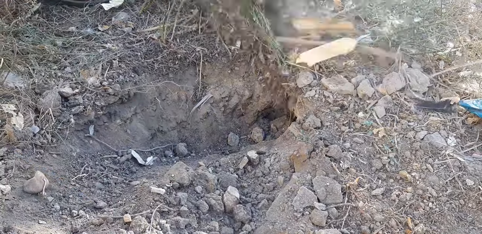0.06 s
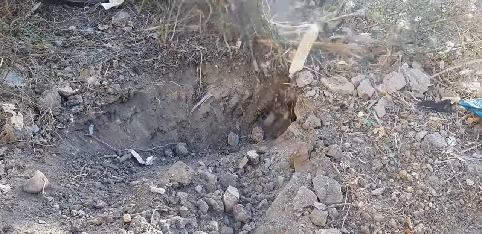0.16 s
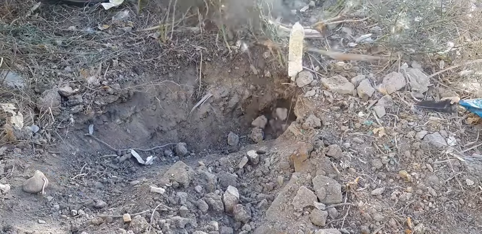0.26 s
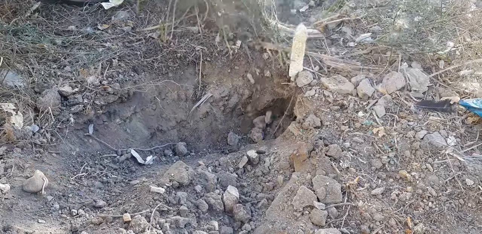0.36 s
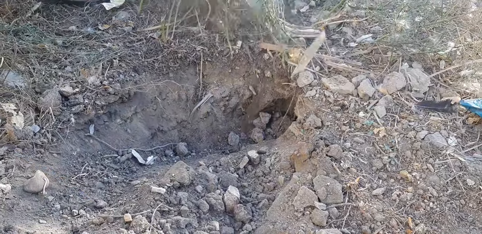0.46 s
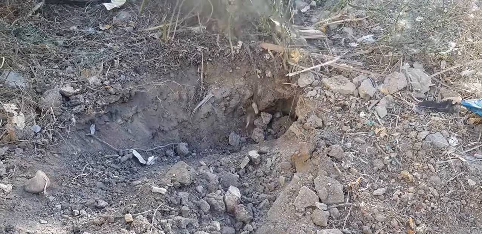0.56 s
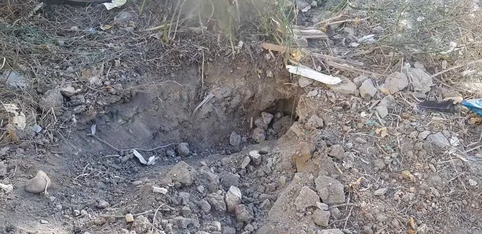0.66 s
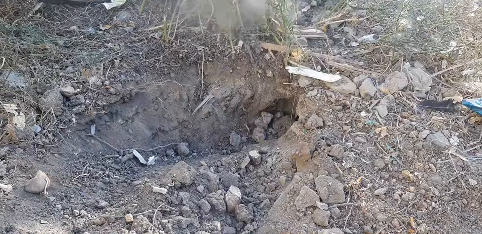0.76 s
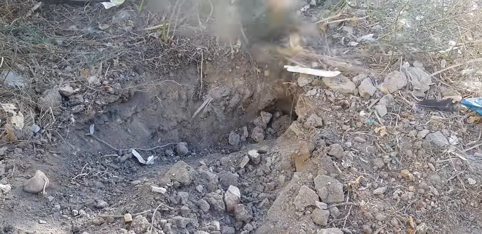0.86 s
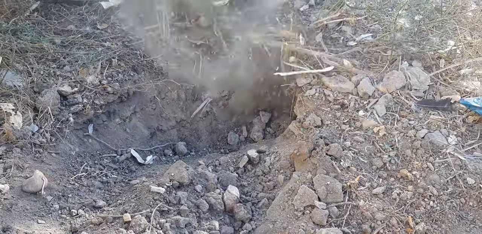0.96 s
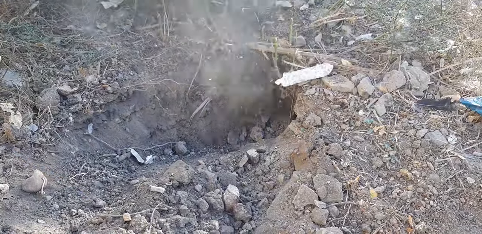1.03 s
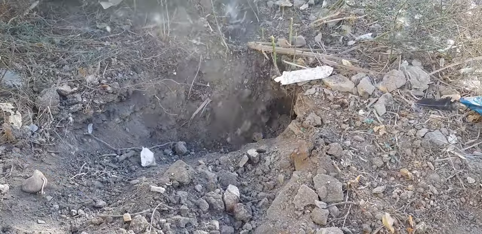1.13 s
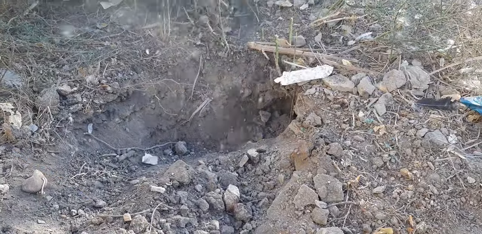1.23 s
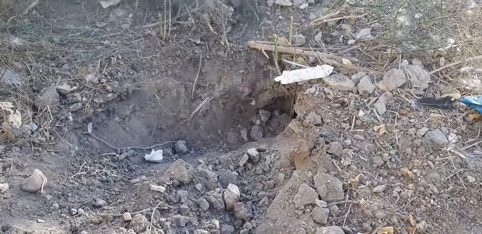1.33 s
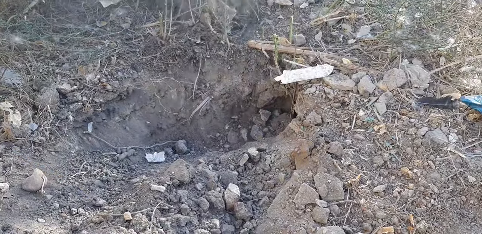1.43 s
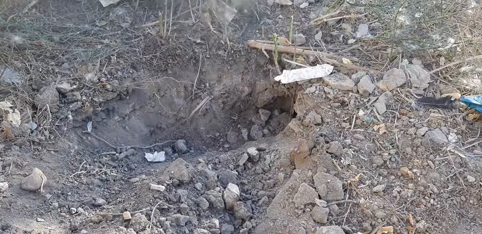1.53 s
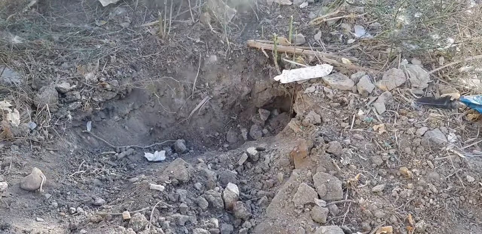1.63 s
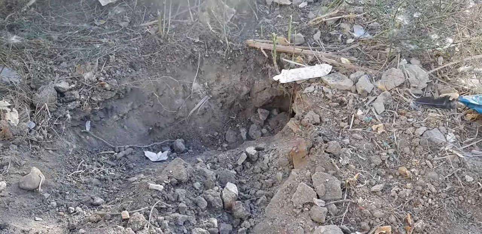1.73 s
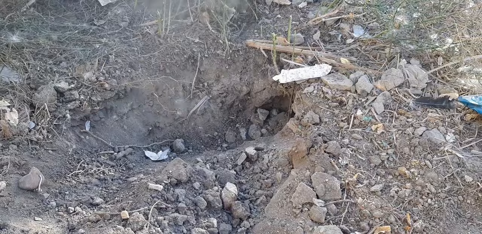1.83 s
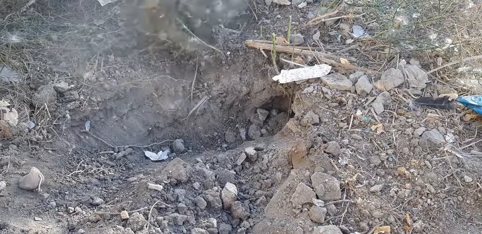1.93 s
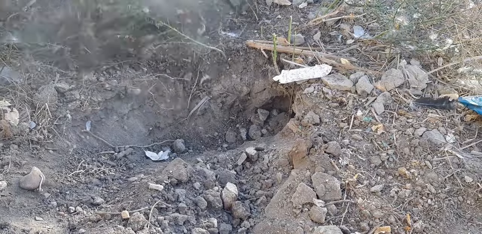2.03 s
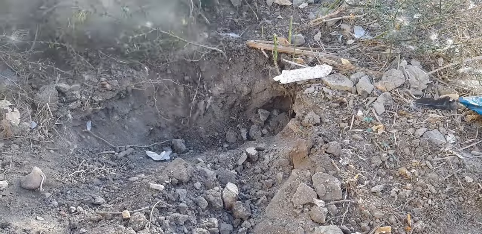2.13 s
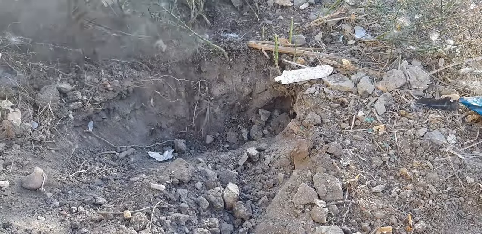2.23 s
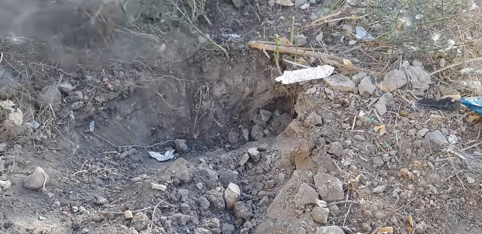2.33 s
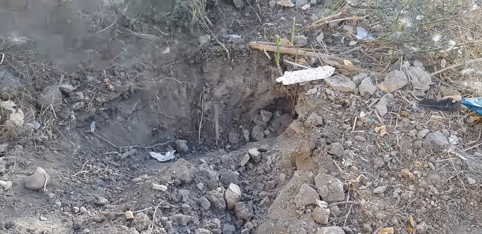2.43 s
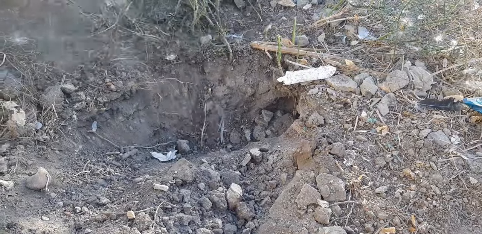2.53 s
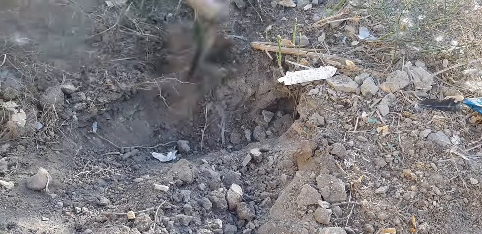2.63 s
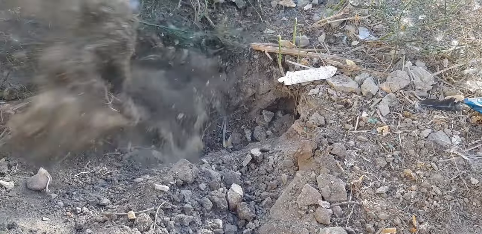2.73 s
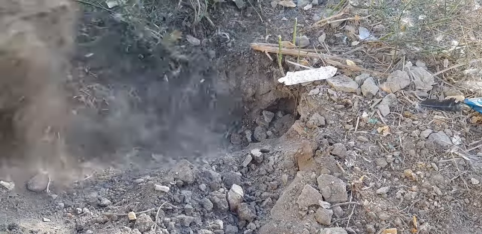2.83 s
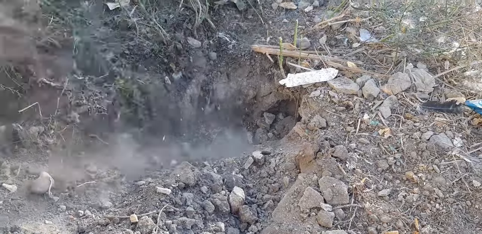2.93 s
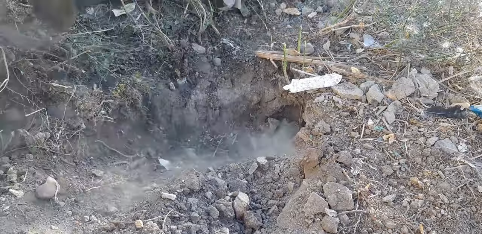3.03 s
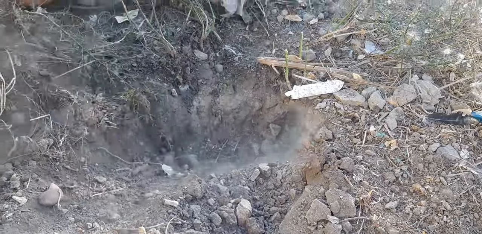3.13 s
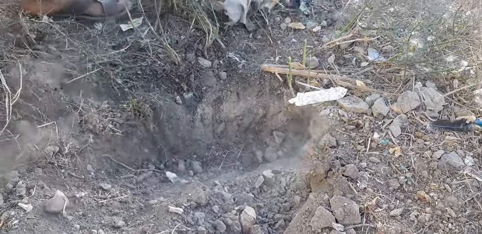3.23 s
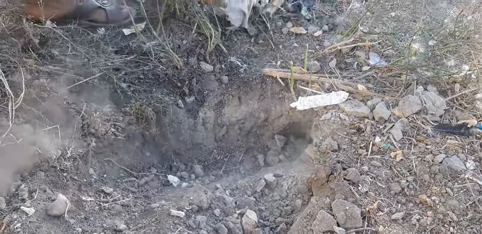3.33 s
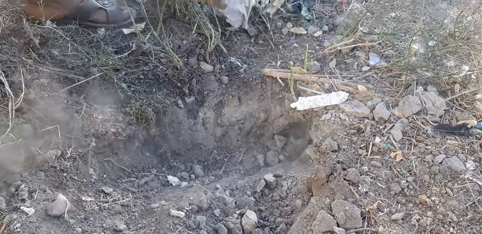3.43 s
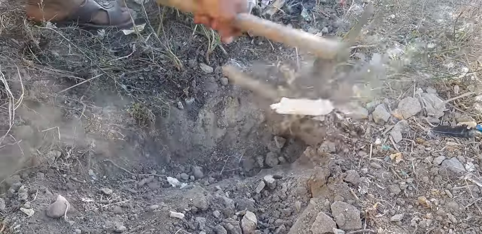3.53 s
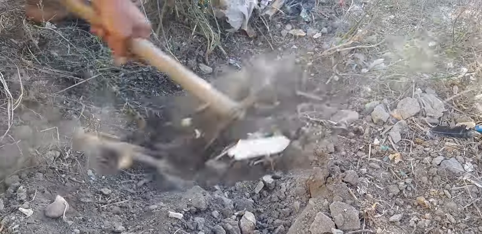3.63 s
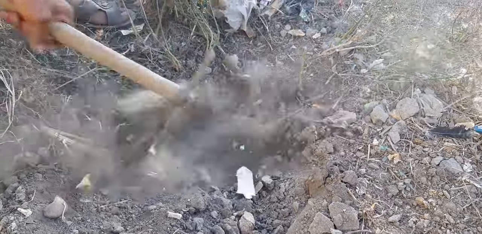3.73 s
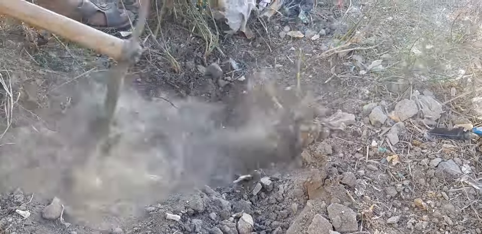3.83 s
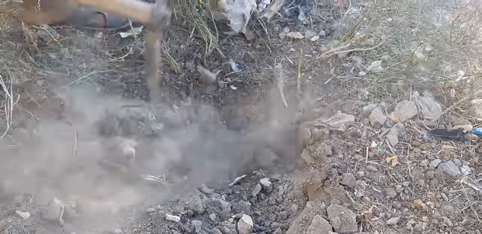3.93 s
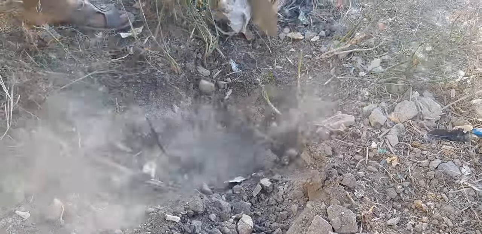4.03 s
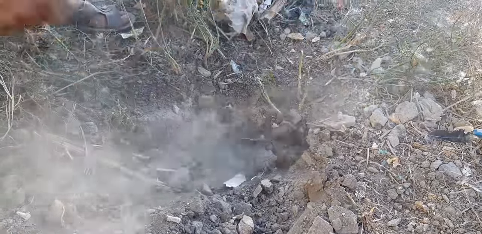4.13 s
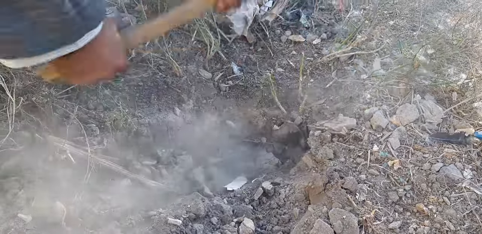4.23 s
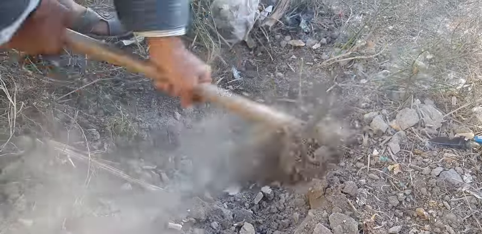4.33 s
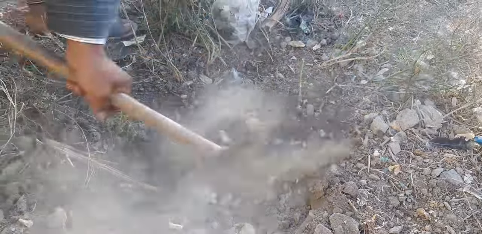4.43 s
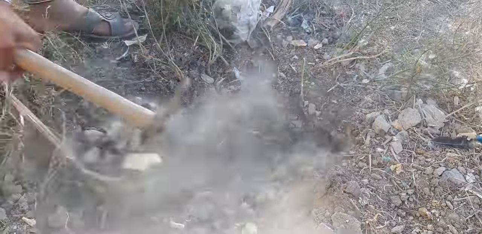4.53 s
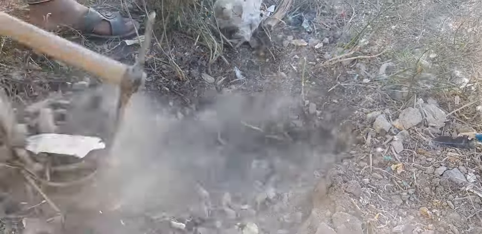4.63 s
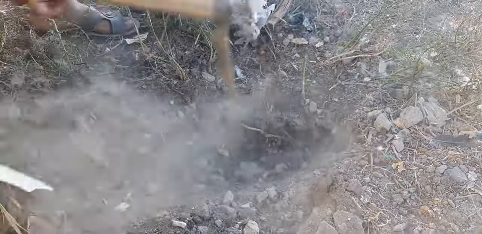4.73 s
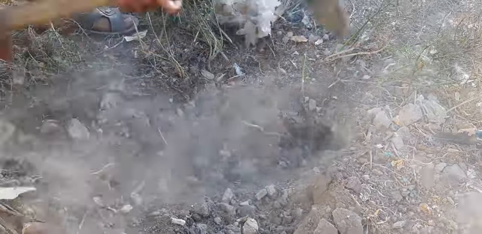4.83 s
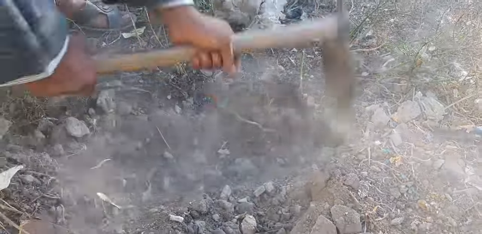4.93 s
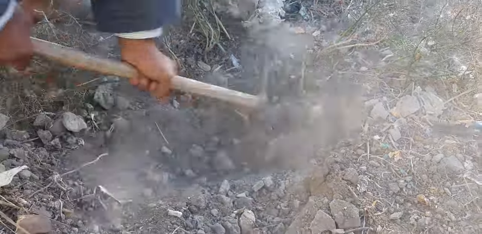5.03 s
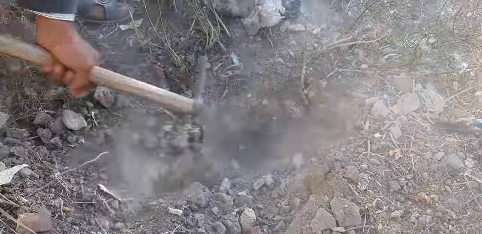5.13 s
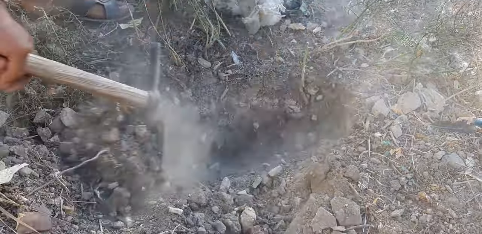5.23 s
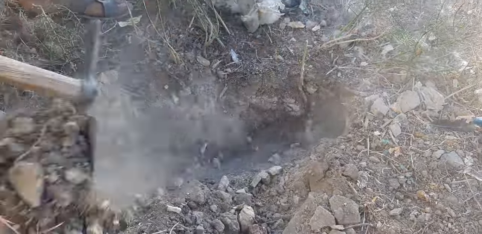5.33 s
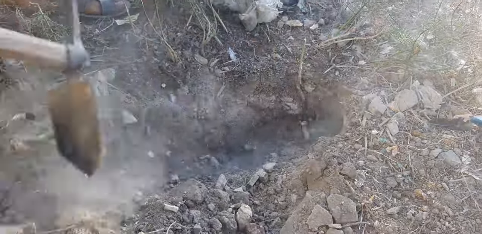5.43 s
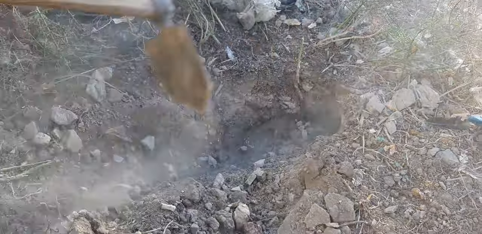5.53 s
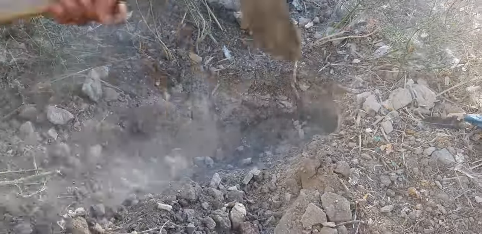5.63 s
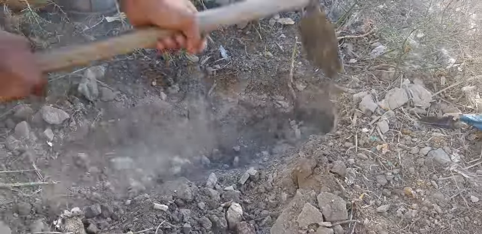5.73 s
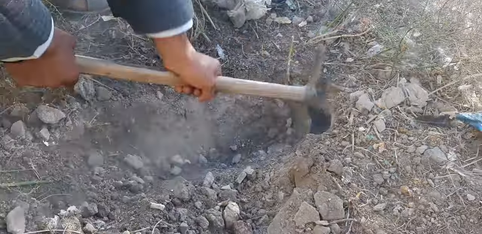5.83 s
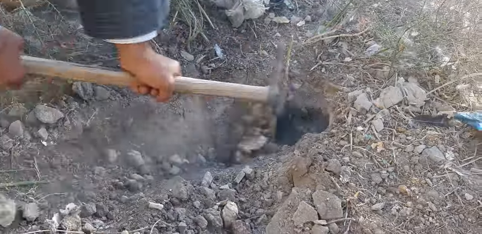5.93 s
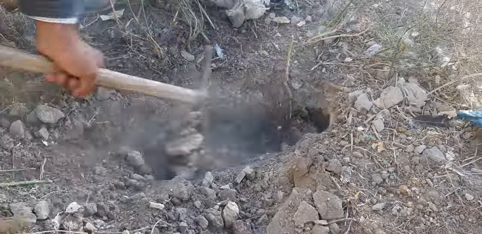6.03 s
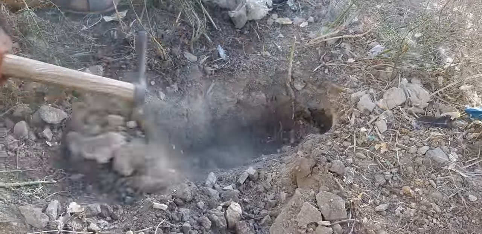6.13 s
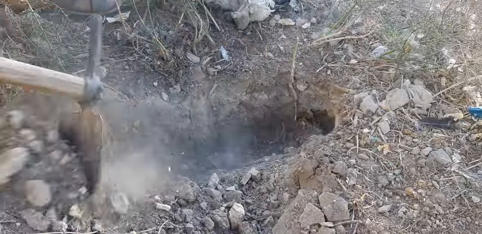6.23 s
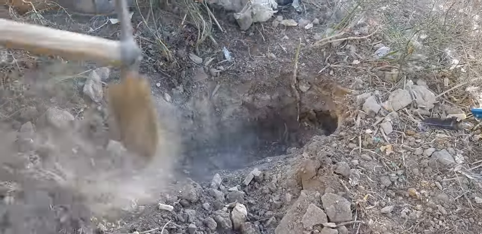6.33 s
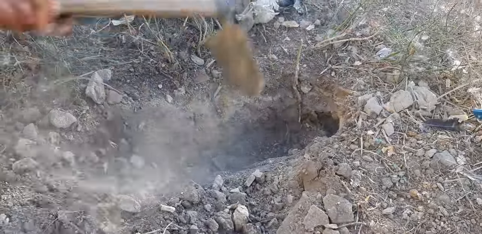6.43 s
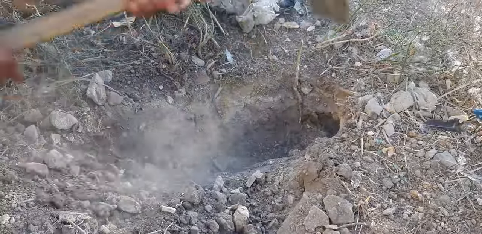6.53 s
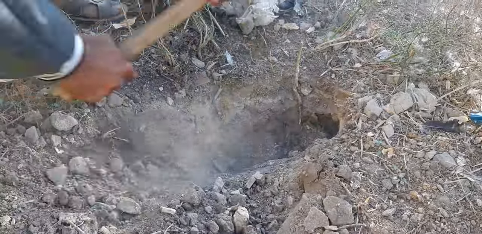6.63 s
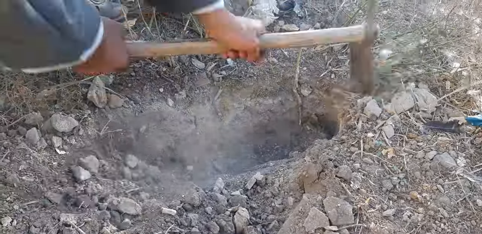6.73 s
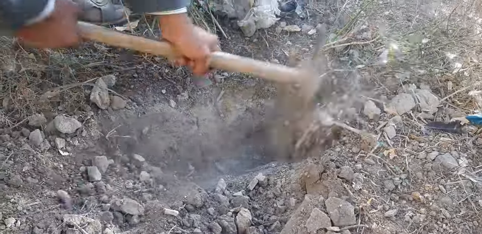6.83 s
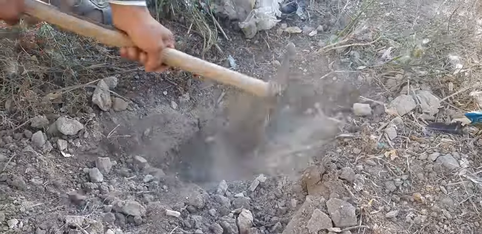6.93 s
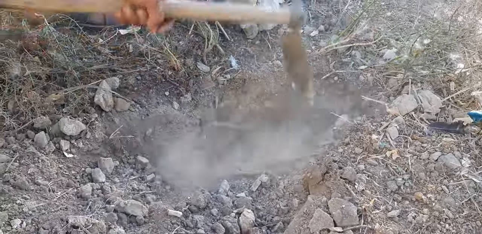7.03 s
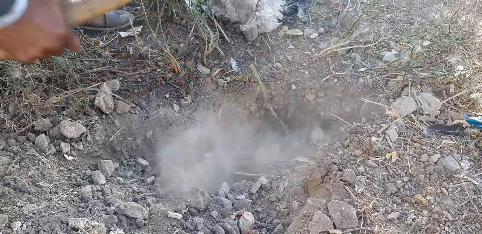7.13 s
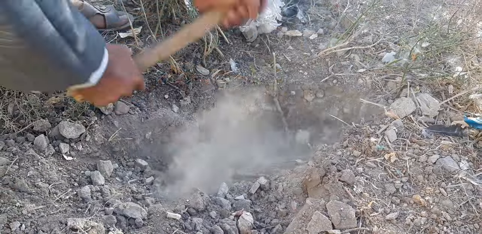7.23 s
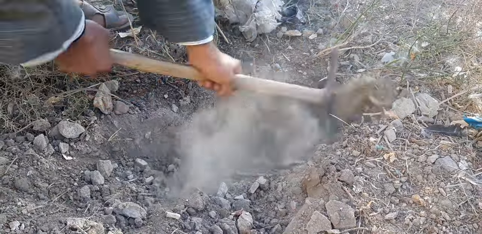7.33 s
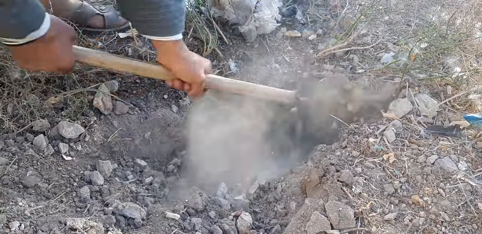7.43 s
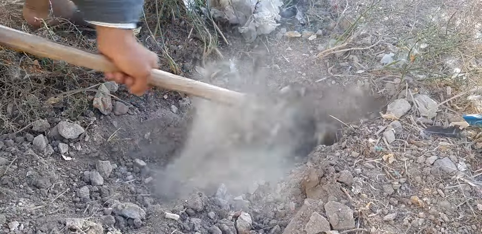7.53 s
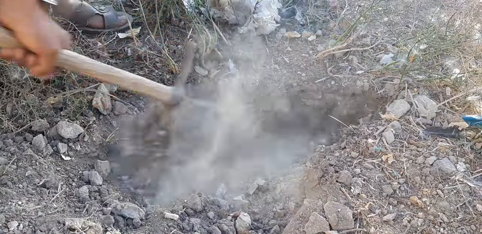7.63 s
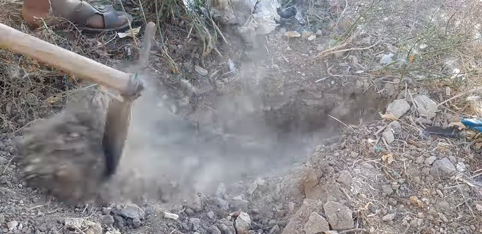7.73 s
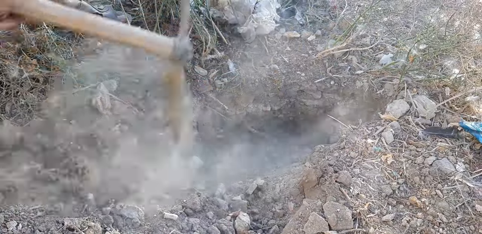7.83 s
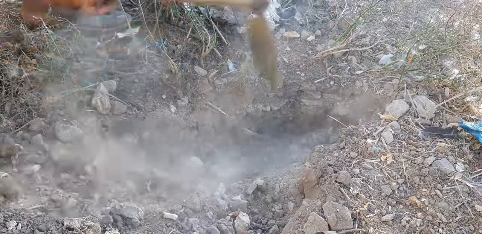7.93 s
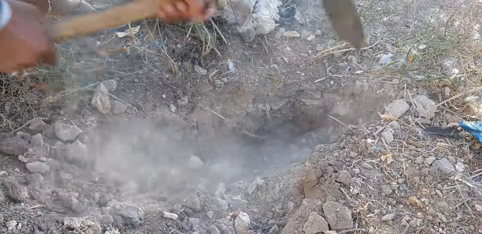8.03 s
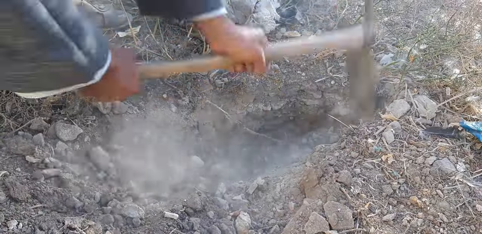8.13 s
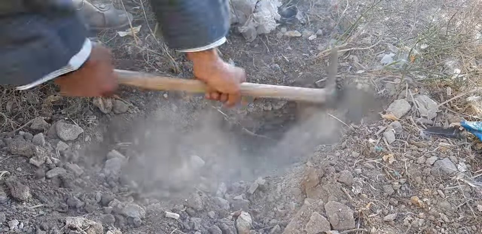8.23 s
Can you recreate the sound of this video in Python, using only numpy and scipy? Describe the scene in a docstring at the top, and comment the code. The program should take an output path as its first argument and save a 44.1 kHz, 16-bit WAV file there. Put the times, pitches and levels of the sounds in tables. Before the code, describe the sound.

Close-up digging outdoors: a steel blade cracks hard crust about once a second, knocking stones and raking loose, gritty earth, with light wind rumble.

```python
"""A pickaxe digs dry stony ground: each blow cracks the crust, knocks stones and thuds in the packed soil.
Stones are noise bursts shaking tuned rings; thuds are pushes ringing the ground's low modes.
Grit, dust and clods slide and patter after each blow as random ringing grains, and big clods land dully.
The steel blade is scraped by the grit and once rings faintly. A breeze rumbles as lumpy low noise on
two microphone ports over quiet air, and a faint far sine tone sounds near the end."""
import sys
import numpy as np
from scipy import signal
from scipy.fft import rfft, irfft, next_fast_len
from scipy.io import wavfile
from scipy.ndimage import uniform_filter1d

SR = 44100
rng = np.random.default_rng(int(sys.argv[2]) if len(sys.argv) > 2 else 0)


def generate_wav(sig):
    """Save sig (samples, or channels by samples) to the path in sys.argv[1] as 16-bit PCM at SR."""
    pcm = np.round(np.clip(np.atleast_2d(sig).T, -1, 1) * 32767).astype(np.int16)
    wavfile.write(sys.argv[1], SR, pcm)


N = 365148

# Modes of the steel head. Each row: pitch in Hz, level when tapped in dB, ring t60 when tapped in seconds,
# level when scraped in dB.
STEEL_MODES = [(870, -2, 0.21, -5.5), (1320, -2, 0.27, -15), (1586, 13, 0.015, 5.5), (2634, 14, 0.041, 3.5),
               (3747, -5, 0.089, -4), (4480, -8, 0.025, 0), (4860, -7, .03, -1.5),
               (5720, -25.5, 0.026, -2.5), (6310, -18, 0.016, 5.5), (7110, -18.5, 0.032, 7.5)]
# Modes the packed soil thuds with. Each row: pitch in Hz, level in dB, t60 in seconds.
GROUND_MODES = [(77.4, -10, 0.065), (127, 0, .05), (179, 8.5, 0.076), (262, -1, 0.08), (427, -15, 0.037)]
# The blade bites the crust. Each row: start in seconds, length in seconds, grit level in dB, then clods,
# dust and slump, each in dB over the grit.
BLADE_BITES = [(0.88, 0.042, -24, -15, 0.5, -38), (1.89, 0.024, -28.5, -6.5, -3, -2.5),
               (2.636, 0.039, -23.5, -6.5, -4.5, 0), (3.506, 0.0039, -31, -10, 5.5, 0),
               (3.547, 0.079, -33, 0, -3.5, 0), (4.3, 0.09, -23.5, -8, -9, -3.5),
               (4.972, 0.11, -26, -5, -9, -6), (5.861, 0.027, -29, -7.5, -9, -25),
               (6.777, 0.16, -24.5, -4.5, -5, -11.5), (7.329, 0.056, -22, -2.5, -6, -9),
               (8.194, 0.092, -26, -8.5, 1, -23.5)]


def gain_of(db):
    """Turns dB into an amplitude factor."""
    return 10 ** (np.asarray(db) / 20)


def evened(x):
    """Scales x to an RMS of one."""
    return x / np.sqrt(np.mean(x ** 2) + 1e-20)


def read(points, hz):
    """Reads a (Hz, value) curve, straight between its points on a log frequency axis."""
    f, value = np.transpose(points)
    return np.interp(np.log(hz + 1), np.log(f + 1), value)


def tinted(x, points):
    """Filters x by a (Hz, dB) spectrum."""
    length = x.shape[-1]
    size = next_fast_len(length)
    gain = gain_of(read(points, np.fft.rfftfreq(size, 1 / SR)))
    return irfft(rfft(x, size) * gain, size)[..., :length]


def ring(x, hz, t60):
    """One decaying mode, a two-pole resonator, struck by x."""
    radius = 10 ** (-3 / (t60 * SR))
    angle = 2 * np.pi * min(hz, SR / 2.2) / SR
    return signal.lfilter([np.sin(angle)], [1, -2 * radius * np.cos(angle), radius * radius], x)


def add(mix, s, sound):
    """Lays a sound into the mix from s seconds, cut off at the end of the mix."""
    part = mix[:, round(s * SR):][:, :sound.shape[1]]
    part += sound[:, :part.shape[1]]


def clumps(seconds):
    """Slow random swings of RMS one: soil slips in lumps."""
    width = max(round(seconds * SR), 2)
    smooth = uniform_filter1d(rng.standard_normal(N), width)
    return evened(uniform_filter1d(smooth, width))


def quiet_air():
    """Steady tinted noise: the quiet surroundings."""
    # Spectrum shape of the surroundings. Each row: frequency in Hz, density in dB per Hz (relative).
    air_spectrum = [(24, -28.5), (40, 24), (345, -0.5), (790, -6), (852, 0), (1680, -42), (4340, -8.5),
                    (4800, -22.5), (16000, -10.5)]
    return gain_of(-61.5) * evened(tinted(rng.standard_normal((3, N)), air_spectrum))


def far_tone():
    """A soft sine from far away that starts high, settles in pitch and wavers in level."""
    # One row: start in seconds, end in seconds, settled pitch in Hz, middle level in dB.
    tone_row = (7.99, 8.195, 447, -63)
    drop_hz, settle_s = 28, 0.035
    start, end, hz, db = tone_row
    t = np.arange(N) / SR
    on = uniform_filter1d(1. * (t > start) * (t < end), 400)  # soft edges
    pitch = hz + drop_hz * np.exp(-abs(t - start) / settle_s)
    level = gain_of(db + 3.9 * clumps(0.0081))
    return on * level * np.sin(2 * np.pi * np.cumsum(pitch) / SR)


def wind(slump):
    """Lumpy low rumble, partly separate at each port: breeze and soil slumping into the trench."""
    # The breeze swells and drops. Each row: time in seconds, level in dB before the lumps.
    breeze_swell = [(0, -51.5), (.38, -35.5), (.52, -48), (.8, -59.5), (1.2, -48), (1.7, -65.5), (2.4, -60),
                    (2.52, -40.5), (3.1, -53), (3.3, -46), (3.9, -66.5), (4.75, -54.5), (4.87, -28.5),
                    (5.35, -87.5), (5.6, -53), (6.1, -40.5), (6.6, -48.5), (7.1, -66), (8.28, -88)]
    # Spectrum shape of the rumble. Each row: frequency in Hz, level in dB (relative).
    rumble_colour = [(25, -45), (45, 5), (130, 6), (250, -7.5), (500, -23), (1200, -51.5)]
    alike, left_db = 0.34, 1  # power share both ports hear alike; left port over right in dB
    shared, *own = evened(tinted(rng.standard_normal((3, N)), rumble_colour))
    gusts = np.sqrt(alike) * shared + np.sqrt(1 - alike) * np.array(own)
    gusts *= gain_of([[left_db / 2], [-left_db / 2]])
    times, levels_db = np.transpose(breeze_swell)
    breeze = gain_of(np.interp(np.arange(N) / SR, times, levels_db))
    lumps = gain_of(3.5 * clumps(0.02) - 1.5)
    return np.hypot(breeze, slump) * lumps * gusts


def since_blow():
    """Seconds since the blade last bit; the first blow fell just before the start."""
    t = np.arange(N) / SR
    starts = np.array([-0.4] + [row[0] for row in BLADE_BITES])
    return t - starts[np.searchsorted(starts, t, "right") - 1]


def spill(s, length, rise_s, fade_db_per_s, end_db_per_s):
    """Power of moving soil: it rises, fades evenly while it runs, then dies quickly."""
    t = np.arange(N) / SR - s
    fall_db = fade_db_per_s * np.clip(t, 0, length) + end_db_per_s * np.clip(t - length, 0, 1)
    return (np.clip(t / rise_s, 0, 1) * gain_of(-fall_db)) ** 2


def moving_soil():
    """Levels of grit, dust, big clods, small clods and slump: the powers of all bites and slides add."""
    # Loosened soil slides and trickles. Each row: start in seconds, length in seconds, grit level in dB,
    # fade in dB per second, clods, dust and slump each in dB over the grit, big clods in dB over small.
    soil_slides = [(-.05, .39, -21.5, 48.4, -9, 1, -30, -2), (0.392, 0.28, -41.5, 32, -13.5, 1, -34, -2),
                   (0.719, 0.18, -58.5, 11, -8, 1.5, 2, 5), (0.925, 0.48, -30, 45, -0.5, 0.5, -5, 1.5),
                   (1.401, 0.64, -50.5, 19, 0, -1.5, 2.5, -4), (1.918, 0.11, -37.5, 18, -5.5, 0.5, -4.5, 1),
                   (2.05, 0.3, -50.5, 26, -7.5, 3.5, 1.5, 2), (2.28, 0.17, -48, 35, -7.5, 1.5, 0, 4),
                   (2.46, 0.27, -62, 2.4, -8.5, 4, -13, 7.5), (2.682, 0.1, -35.5, 2.7, -9, -5.5, 6, -5.5),
                   (2.83, 0.82, -46, 35.5, -21, 2, 10.5, 17),
                   (3.47, 0.046, -45, 3.9, -11.5, 0.5, -11.5, -8),
                   (3.599, 0.23, -37.5, 63, -4, -2, 1.5, -4), (3.8, 0.63, -57.5, 20.5, -4, 1, -14, 0.5),
                   (4.378, 0.031, -39, 5, 5, -3.5, 0, -0.5), (4.45, 0.47, -50.5, 20, -5.5, -0.5, 3.5, 1),
                   (5.07, 0.15, -48, 3.5, 4.5, -7.5, 5.5, 2), (5.21, 0.03, -43.5, 3, -4, -4.5, -20, 3),
                   (5.28, 0.49, -55.5, 3.6, -5, -3, -42.5, 2.5), (5.9, 0.24, -43.5, 2.5, 1, -8, -0.5, 0.5),
                   (6.201, 0.13, -58, 4.3, -2, 1, 14.5, 1), (6.358, 0.033, -45, 3, -25, 3, -2.5, 1),
                   (6.462, 0.84, -62, 14, -5.5, -1.5, -11.5, 1.5),
                   (6.93, 0.86, -50, 84, -2.5, 0.5, -13, -2.5), (7.432, 0.27, -47, 3.1, 0, -7, -44, 0),
                   (7.73, 0.63, -62.5, 7.5, -8, -4, -19, 4), (7.86, 0.045, -64, 2.9, -21, 12.5, -18, 3)]
    power = np.zeros((5, N))

    def move(envelope, db, clods_db, dust_db, slump_db, big_db):
        mix_db = db + np.array([0, dust_db, clods_db + big_db / 2, clods_db - big_db / 2, slump_db])
        power[:] += gain_of(2 * mix_db)[:, None] * envelope  # twice the dB: power

    for s, length, db, clods_db, dust_db, slump_db in BLADE_BITES:
        bite = spill(s, length, rise_s=0.002, fade_db_per_s=96, end_db_per_s=493.5)
        move(bite, db, clods_db, dust_db, slump_db, big_db=-0.5)
    for s, length, db, fade, clods_db, dust_db, slump_db, big_db in soil_slides:
        slide = spill(s, length, rise_s=0.042, fade_db_per_s=fade, end_db_per_s=183)
        move(slide, db, clods_db, dust_db, slump_db, big_db)
    return np.sqrt(power)


def patter(lo_hz, hi_hz, per_s, cycles, spread_db, tilt_db, patchy_db, count):
    """Grains of many sizes land at random, each ringing for some cycles. Rows: shared path, left, right."""
    out = np.zeros((3, N))
    for k, hz in enumerate(np.geomspace(lo_hz, hi_hz, count)):
        where, chance, sign = rng.random((3, 3, int(per_s * N / SR)))
        force = gain_of(-spread_db * np.log(chance + 0.001)) * np.sign(sign - 0.5)
        train = np.zeros((3, N))
        np.put_along_axis(train, (where * N).astype(int), force, 1)
        train *= gain_of(patchy_db * clumps(0.023))  # each size of grain comes in spurts of its own
        t60 = cycles / hz
        grains = ring(ring(train, hz, t60), hz, t60)  # ringing twice softens each onset
        out += gain_of(tilt_db * k / count) * evened(grains)
    return evened(out)


def soil(grit_level, dust_level, big_level, small_level):
    """Dust hisses, grit crackles and clods patter lower; dust, grit and small clods slip in the same lumps."""
    lumps = clumps(0.0051)
    fresh = np.exp(-since_blow() / 0.29)  # fresh rubble is coarse, then fine soil trickles
    dust = patter(6500, 18000, per_s=1208, cycles=2.02, spread_db=0.72, tilt_db=14, patchy_db=0.94, count=5)
    dust *= gain_of(1.5 * lumps)
    grit = patter(1770, 7130, per_s=500, cycles=16, spread_db=1.8, tilt_db=9 - 4 * fresh,
                  patchy_db=2 + 0.8 * fresh, count=22)
    grit *= gain_of((0.64 + fresh) * lumps)
    grit *= gain_of(fresh * 2.7 * clumps(0.0085))  # fresh rubble crunches in separate bursts
    big = patter(398, 581, per_s=90, cycles=5.5, spread_db=3.4, tilt_db=1, patchy_db=4.8, count=5)
    small = patter(727, 1560, per_s=400, cycles=11, spread_db=2, tilt_db=3, patchy_db=2.6, count=7)
    small *= gain_of(0.95 * lumps)
    # a few larger bits tick among the grit
    pebbles = patter(890, 6500, per_s=5.3, cycles=60, spread_db=3, tilt_db=13, patchy_db=2.1, count=9)
    clods = (big_level * evened(big) + small_level * evened(small)) / np.sqrt(2)
    gritty = grit_level * (evened(grit) + gain_of(-16.5) * pebbles)
    return gritty + dust_level * evened(dust) + clods


def scrape(grit_level):
    """Grit grinds along the blade in jerks; each mode of the steel speaks in spurts of its own."""
    rub = rng.standard_normal((3, N)) * gain_of(3.5 * clumps(0.0021))
    modes = np.zeros((3, N))
    for hz, _, _, db in STEEL_MODES:
        spurts = gain_of(db + 14 * clumps(0.025))
        modes += spurts * evened(ring(rub, hz, t60=0.0085))  # the soil damps the ring
    fade = np.exp(-since_blow() / 0.075)
    return gain_of(-7) * grit_level * fade * evened(modes)


def blade():
    """The steel head rings as decaying sine modes after a stone taps it."""
    # Stones that ring the blade. Each row: time in seconds, level in dB added to that of every mode.
    blade_taps = [(3.891, -45.5)]
    out, t = np.zeros((3, N)), np.arange(20000) / SR
    for s, db in blade_taps:
        phases = 2 * np.pi * rng.random(len(STEEL_MODES))
        modes = np.zeros(len(t))
        for (hz, mode_db, t60, _), phase in zip(STEEL_MODES, phases):
            modes += gain_of(mode_db - 60 * t / t60) * np.sin(2 * np.pi * hz * t + phase)
        add(out, s, gain_of(db) * modes[None] * (1 - np.exp(-t / 0.000116)))
    return out


def clods_landing():
    """Each big clod lands and breaks: a dull noise burst rings a few low, quickly damped pitches."""
    # Clods that land. Each row: time in seconds, peak level in dB, pitch in Hz.
    clod_falls = [(0.349, -22, 600), (0.961, -22.5, 474), (1.001, -19.5, 517), (1.045, -22, 454),
                  (1.086, -23.5, 420), (1.141, -24.5, 395), (1.201, -30, 534), (1.271, -21.5, 478),
                  (3.707, -21, 544), (6.152, -17, 498), (7.582, -28, 586), (7.636, -28.5, 502)]
    out, t = np.zeros((3, N)), np.arange(6000) / SR
    envelope = (1 - np.exp(-t / 0.00071)) * (0.5 + np.exp(-t / 0.003)) * gain_of(-60 * t / 0.054)
    for s, db, hz in clod_falls:
        burst = rng.standard_normal((3, len(t))) * envelope
        body = 2 * evened(ring(burst, hz, 14 / hz))
        crumb_pitches = hz * np.geomspace(0.5, 4, 4)
        crumbs = sum(evened(ring(burst, f, 6 / f)) for f in crumb_pitches)
        clod = body + crumbs
        add(out, s, gain_of(db) * clod / abs(clod).max())
    return out


def ground_ring(push_s):
    """The packed soil's modes, rung by a push that dies away over push_s seconds."""
    push = np.exp(-np.arange(6000) / SR / push_s)
    return sum(gain_of(db) * evened(ring(push, hz, t60)) for hz, db, t60 in GROUND_MODES)


def thuds():
    """The packed soil takes a short push and rings low for a moment."""
    # Thuds under the heavier bites. Each row: time in seconds, peak level in dB.
    heavy_bites = [(0.914, -26.5), (1.9, -35.5), (2.641, -18.5), (3.513, -14), (3.551, -37.5),
                   (4.302, -18.5), (4.975, -37.5), (6.784, -17), (7.334, -25.5), (7.371, -20.5),
                   (8.243, -23.5)]
    out, thud = np.zeros((3, N)), ground_ring(0.00022)
    for s, db in heavy_bites:
        add(out, s, gain_of(db) * thud[None] / abs(thud).max())
    return out


def knocks():
    """A ragged crack and a snap shake the stone's two pitches and the upper steel modes; the ground thuds."""
    # Single stones crack or knock. Each row: start in seconds, reference level in dB, high pitch in Hz,
    # low pitch in Hz, low pitch and ground thud each in dB over the reference,
    # crack t60 in seconds (5 ms at least).
    stone_knocks = [(0.697, -37.5, 5850, 2200, -41, -42, 0.072),
                    (0.848, -39.5, 4200, 1374, -28, -13, 0.019),
                    (0.884, -16.5, 6340, 1820, -26.5, -31, 0.046), (0.891, -5, 4500, 1520, -5, -32, 0.1),
                    (0.902, -6, 3740, 1780, -25, -24, 0.014), (0.912, -9.5, 2830, 806, -1.5, -21, 0.039),
                    (1.075, -20, 2400, 1400, 4, -33, 0.02), (1.879, -25, 4720, 1513, -35, -27, 0.25),
                    (1.895, -12.5, 3260, 1480, -7, -40.5, 0.036), (2.639, -6, 6040, 1610, -13, -40, 0.018),
                    (2.645, -8, 6370, 1500, -42, -35, 0.082), (2.628, -23.5, 4400, 1410, -13, -41, .09),
                    (2.66, -7.5, 2500, 1640, -32, -24, 0.025), (2.699, -27, 5670, 1580, -8.5, 10, 0.039),
                    (2.741, -24, 5600, 842, -21, -31, 0.042), (2.76, -19, 4900, 870, -8, -20.5, 0.04),
                    (2.773, -21.5, 3815, 1900, -1, -28.5, 0.042), (2.793, -17, 3606, 1360, -32, -28, 0.1),
                    (2.809, -18.5, 4800, 1425, -37, -29.5, 0.068),
                    (2.82, -22.5, 5000, 2600, -18, -29.5, 0.021),
                    (2.838, -28.5, 4200, 1320, -37, -21.5, 0.032),
                    (2.972, -35.5, 4200, 1920, -30, -19, 0.035),
                    (3.066, -39, 3900, 2010, -27.5, -26.5, 0.051),
                    (3.508, -13, 5100, 1950, -27, -20.5, 0.027), (3.549, -6, 6900, 1580, -40, -63, 0.025),
                    (3.565, -17, 3840, 913, -16.5, -35, 0.076),
                    (3.574, -17.5, 6500, 1570, -16, -33.5, 0.078),
                    (3.598, -19.5, 2940, 1407, -9, -26, 0.063), (3.617, -22, 4900, 1300, -24, -29.5, 0.038),
                    (3.686, -24.5, 6300, 1340, -2.5, -23, 0.04), (3.711, -26, 4500, 537, -9, -31, 0.024),
                    (3.726, -31, 4400, 1500, -21.5, -32, 0.018), (3.761, -28, 2640, 680, -8, -30.5, 0.058),
                    (3.773, -19, 4960, 2700, -32, -36, 0.078), (3.892, -35, 2290, 1600, -35, -51, 0.11),
                    (4.056, -44, 2550, 1350, 0, -27, 0.018), (4.302, -7, 5000, 1270, -37.5, -15, 0.03),
                    (4.328, -15, 4140, 1617, -24, -3.5, 0.046), (4.346, -12.5, 4200, 1530, -24, -30, 0.098),
                    (4.356, -14.5, 3900, 2620, -22, -25, 0.034), (4.366, -16.5, 4830, 886, -1.5, -9, 0.02),
                    (4.415, -19.5, 2570, 820, -3, -32, 0.017), (4.523, -25.5, 2700, 870, 0, -32.5, 0.017),
                    (4.395, -21.5, 3800, 1290, -3.5, -30.5, .04), (4.7, -44, 3680, 431, -26, -25, 0.02),
                    (4.974, -12, 2750, 1370, -36, -35, 0.0088), (4.977, -7, 3210, 890, -22, -36, 0.035),
                    (4.993, -13, 3380, 1880, -13.5, -33.5, 0.035),
                    (5.011, -11.5, 4340, 1056, -21.5, -23, 0.024), (5.02, -19, 4300, 920, -16, -32, .02),
                    (5.039, -20, 4150, 2500, -11.5, -35, 0.037), (5.045, -13, 4280, 1255, -12, -29, 0.081),
                    (5.057, -11.5, 5700, 1020, -23, -39.5, 0.023), (5.158, -28, 4550, 767, 2.5, -24, 0.072),
                    (5.244, -22, 4450, 1750, 6, -39, 0.047), (5.333, -35.5, 4400, 638, -35, -39, 0.15),
                    (5.518, -35, 5300, 950, -19, -37.5, 0.0302), (5.863, -20, 3450, 1580, -7, -43.5, 0.021),
                    (5.869, -11.5, 6100, 921, -34, -50, 0.081), (5.92, -19, 5540, 1120, -4.5, -44, 0.033),
                    (5.926, -16, 4450, 970, -19, -26.5, 0.019),
                    (5.957, -22.5, 4470, 2200, -10, -35.5, 0.032),
                    (5.968, -19.5, 2780, 1040, 1.5, -34.5, 0.041),
                    (6.009, -32, 4250, 510, -2, -21.5, 0.033), (6.057, -30, 2600, 1020, 4, -24, 0.074),
                    (6.087, -8, 4330, 1085, -2, -36, 0.025), (6.154, -23, 4500, 517, -28, -24.5, 0.045),
                    (6.178, -31, 4670, 702, -12, -23.5, 0.026),
                    (6.216, -39.5, 4400, 544, -14.5, -19, 0.038),
                    (6.313, -35.5, 5400, 1530, -38, -21, 0.045),
                    (6.396, -47.5, 3440, 2020, -29, -35.5, 0.019),
                    (6.78, -3, 3990, 1532, -15, -17.5, 0.037), (6.794, -16, 3800, 1585, 7.5, -27.5, 0.044),
                    (6.83, -22, 3690, 1314, -15, -29, 0.074), (6.84, -12, 3850, 1590, -19.5, -29.5, 0.068),
                    (6.875, -18.5, 2800, 960, -3.5, -35, 0.046),
                    (6.902, -10, 6500, 1340, -3.5, -34.5, 0.06),
                    (7.334, -5, 7220, 1970, -32.5, -37.5, 0.027), (7.37, -12.5, 6500, 710, -5, -25.5, 0.03),
                    (7.387, -20, 6600, 1300, -6.5, -22, 0.021), (7.493, -22.5, 6660, 1800, -2, -38, 0.073),
                    (7.51, -29, 4230, 1100, -11, -40, 0.029), (7.515, -25.5, 6930, 1500, -19, -41, 0.016),
                    (7.562, -30, 5550, 2720, 1, -29.5, 0.077), (7.615, -41, 4000, 2710, 5, -37.5, 0.014),
                    (7.7, -24.5, 6600, 910, -9, -21, 0.034), (8.201, -8, 3050, 1570, -47, -31.5, 0.073),
                    (8.243, -16.5, 2770, 1290, -1, -28.5, 0.072), (8.267, -20, 2820, 2030, 7.5, -25, 0.14)]
    out, t = np.zeros((3, N)), np.arange(5000) / SR
    upper_steel = STEEL_MODES[2:]
    thud = ground_ring(0.0018)[:len(t)]
    snap_at_s, snap_width_s = 0.0018, 0.0008  # the stone splits with one sharp snap
    snap_shape = np.exp(-abs(t - snap_at_s) / snap_width_s)
    for s, db, high_hz, low_hz, low_db, thud_db, t60 in stone_knocks:
        noise, steps = rng.standard_normal((3, len(t))), rng.standard_normal(len(t))
        ragged = gain_of(5.26 * evened(uniform_filter1d(steps, 30)))  # the crust breaks in small steps
        rise_s = 0.0011 * gain_of(-0.15 * db)  # soft knocks start more gently
        rise = 1 - np.exp(-(t / rise_s) ** 2)
        crack = noise * ragged * rise * gain_of(-60 * t / max(t60, 0.005))
        chips = np.zeros((3, len(t)))
        for hz, _, _, scraped_db in upper_steel:
            detune, strength = rng.standard_normal(2)  # where the blow lands varies the modes
            mode = ring(crack, hz * (1 + 0.028 * detune), 65 / hz)
            chips += gain_of(0.16 * scraped_db + 12 * strength) * evened(mode)
        tap = crack * (0.25 + np.exp(-t / 0.0026))  # first contact drives the stone hardest
        snap = ring(noise * snap_shape, high_hz, 3 / high_hz)
        # each part with its peak in dB over the reference level
        parts = [(crack, -5),
                 (snap, -9 + 0.3 * db),  # soft knocks snap less
                 (chips, -1.5),
                 (ring(tap, high_hz, 45 / high_hz), -5),
                 (ring(tap, low_hz, 15 / low_hz), low_db),
                 (thud * np.sign(noise[:, :1]), thud_db)]  # random polarity on each path
        add(out, s, sum(gain_of(db + part_db) * x / abs(x).max() for x, part_db in parts))
    return out


def ports(paths):
    """Both ports take the shared path, with a phase lead on the left, plus a path of their own."""
    # Power share both ports hear alike. Each row: frequency in Hz, share from 0 to 1.
    alike_share = [(60, 0.9), (300, 0.97), (1000, 0.88), (4000, 0), (15000, 0.46)]
    # Phase lead of the left port on the shared path. Each row: frequency in Hz, lead in radians.
    left_lead = [(0, -3), (860, 0.88), (2500, 1.48), (3880, -4.3), (6460, 5.5), (9130, 2.9), (10500, 5.5),
                 (13500, 4.5), (16500, 8)]
    # Left port over right. Each row: frequency in Hz, level difference in dB.
    left_over_right = [(60, 1), (200, 1), (700, 0), (1290, 1.5), (2380, 0.5), (4400, 0.5), (8120, 0.5),
                       (15000, 2.5)]
    size = next_fast_len(N)
    hz = np.fft.rfftfreq(size, 1 / SR)
    shared, left, right = rfft(paths, size)
    same = np.sqrt(np.clip(read(alike_share, hz), 0, 1))
    own = np.sqrt(1 - same ** 2)
    turn = np.exp(0.5j * read(left_lead, hz))  # half the lead on each port
    lean = gain_of(read(left_over_right, hz) / 2)
    left_port = (same * shared * turn + own * left) * lean
    right_port = (same * shared / turn + own * right) / lean
    return irfft([left_port, right_port], size)[:, :N]


def scene():
    """The digging and the air pass through the ports; rumble and far tone are added after them."""
    *levels, slump = moving_soil()
    ground = soil(*levels) + scrape(levels[0]) + clods_landing() + thuds()
    digging = ground + blade() + knocks()
    return ports(digging + quiet_air()) + wind(slump) + far_tone()


def record(dry):
    """Microphone colour, clipping at full scale, then a steep low-pass."""
    # Microphone colour. Each row: frequency in Hz, gain in dB.
    mic_colour = [(40, -18), (200, -5.5), (1500, 0.5), (2150, -0.5), (2800, 2.5), (4300, 4), (5300, 2),
                  (6400, 3), (7300, -0.5), (8500, 0), (12500, 3), (16000, -8)]
    coloured = np.clip(tinted(dry, mic_colour), -1, 1)
    low_pass = signal.firwin(511, 15900, window=("kaiser", 9), fs=SR)  # edge in Hz
    return signal.oaconvolve(coloured, low_pass[None], "same")


dry = scene()
out = record(dry)
generate_wav(out)
```